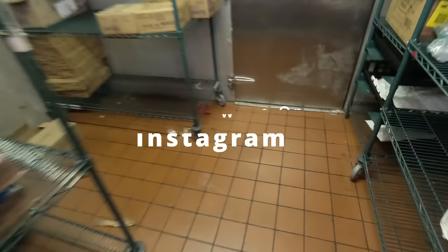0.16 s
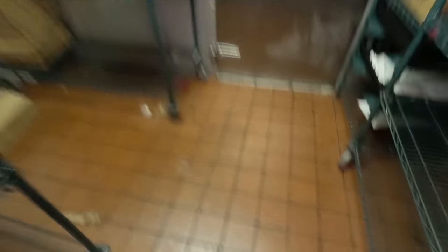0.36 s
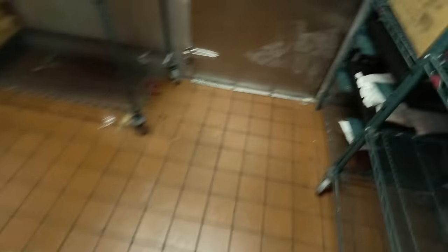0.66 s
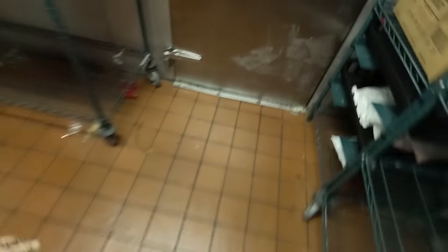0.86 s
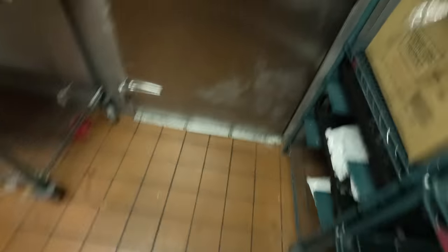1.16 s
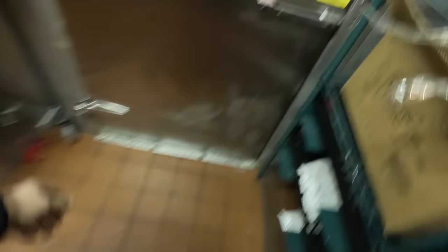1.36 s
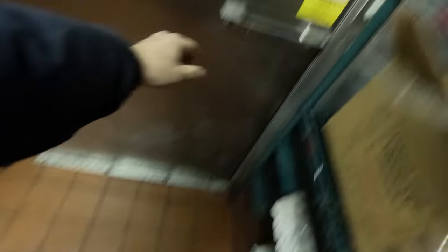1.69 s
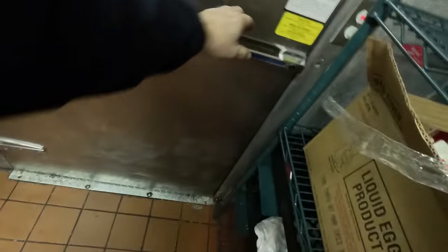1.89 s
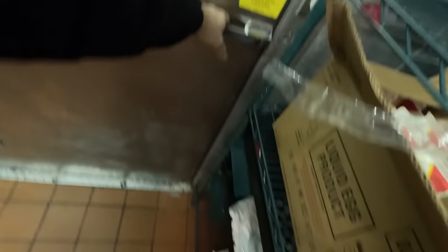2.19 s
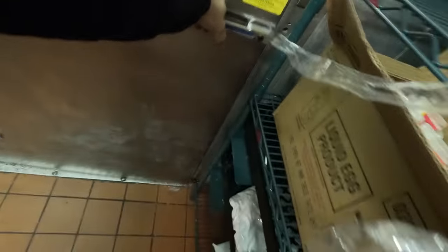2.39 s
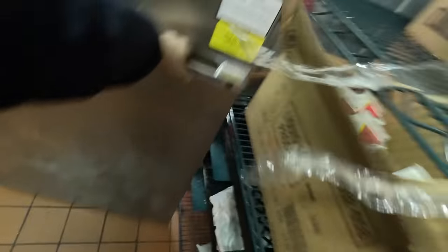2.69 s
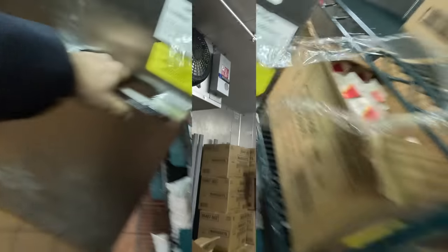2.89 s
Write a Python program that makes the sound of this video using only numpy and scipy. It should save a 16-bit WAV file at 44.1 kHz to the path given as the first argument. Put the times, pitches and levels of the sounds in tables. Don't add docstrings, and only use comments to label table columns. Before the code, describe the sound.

Steady fan roar and low hum fill a tiled kitchen cooler; a wire rack clanks hard, a caster squeaks, then a freezer door latch clunks three times and opens, heard close on a handheld microphone.

```python
import sys
import numpy as np
from scipy import signal
from scipy.fft import rfft, irfft, next_fast_len
from scipy.io import wavfile

SR = 44100
rng = np.random.default_rng(int(sys.argv[2]) if len(sys.argv) > 2 else 0)


def generate_wav(sig):
    pcm = np.round(np.clip(np.atleast_2d(sig).T, -1, 1) * 32767).astype(np.int16)
    wavfile.write(sys.argv[1], SR, pcm)


def gain_from_db(level_db):
    decades = np.asarray(level_db, float) / 20
    return 10 ** decades


N = 134505
T = np.arange(N) / SR

# t/s, level/dB
AIR_LEVEL = [(0.0, -28.5), (0.11, -27), (0.63, -26), (0.94, -28), (1.34, -29), (1.57, -34.5), (1.83, -34),
             (2.39, -30.5), (2.55, -29), (2.67, -25), (2.8, -33), (3.05, -36.5)]
# f/Hz, level per Hz/dB
AIR_COLOUR = [(80, -40.5), (118, -19), (250, -19.5), (380, -12), (470, -23.5), (1000, -26.5), (2600, -29),
              (7000, -47),
              (9000, -72.5), (10500, -56), (12000, -57), (15000, -66)]
# f/Hz, width/Hz, level/dB
BOX_TONES = [(135, 13, 6.5), (208, 74, 5.5), (321.4, 40.7, 2), (593, 64, 6)]
# t/s, f/Hz, level/dB, upper tone level/dB
BLADE = [(0.0, 246.7, -13, -25), (0.02, 245.1, -25, -29), (0.27, 244.7, -12.5, -16),
         (0.33, 244.5, -13.5, -46), (0.39, 244.9, -14.5, -30.5), (0.71, 245, -15.5, -40.5),
         (0.73, 243, -22, -26), (0.9, 243.7, -9, -29.5), (1.05, 244.6, -14, -18.5), (1.13, 243.7, -19, -26),
         (1.23, 243.0, -12, -21), (1.64, 243.9, -24, -39.5), (2.41, 244.2, -25, -29), (2.45, 243, -16, -38),
         (2.58, 242.9, -25, -31), (2.65, 240, -17, -30.5), (2.79, 248.4, -34.5, -24),
         (3.05, 242.6, -29, -45)]
# t/s, level/dB, length/s, f/Hz
RUSTLES = [
    (0.888, -41, 0.025, 6800),
    (2.424, -50, 0.021, 3870),
]
# t/s, level/dB, time to fall 60 dB/s, centre f/Hz, width as share of centre
CRACKS = [(1.195, -36, 0.093, 4000, 1), (1.244, -21, 0.33, 2590, 0.45), (1.3695, -20.5, 0.34, 2030, 1.1),
          (1.369, -29.5, .15, 5430, 0.16), (1.399, -26, 0.37, 2870, 0.54), (1.452, -34.5, 0.11, 4030, 0.82),
          (1.694, -47, .03, 7200, 0.56), (1.916, -34.5, 0.019, 4720, 0.29), (2.358, -41, 0.067, 6950, 0.67),
          (2.502, -38, 0.027, 7130, 0.12), (2.519, -39, 0.039, 8000, .6), (2.569, -31, 0.019, 6570, 0.57),
          (2.5969, -12, 0.028, 2460, 0.56), (2.605, -30.5, 0.34, 1780, 0.54),
          (2.708, -17, 0.059, 1990, 1.25), (2.715, -34.5, 0.37, 3080, 1.8), (2.8195, -22, 0.07, 2510, 1.14),
          (2.824, -24, 0.2, 1800, 1.7), (2.821, -39, 0.11, 7000, 0.69)]
# t/s, level/dB, rattle length/s, strongest f/Hz, spread/octaves
RACK_HITS = [
    (1.1955, -15.5, 0.023, 3400, 0.77),
    (1.2432, -14.5, 0.016, 3050, .7),
    (1.251, -11, 0.076, 2180, 0.21),
    (1.255, -17.5, 0.074, 1010, .7),
    (1.285, -26, .04, 2900, 0.28),
    (1.367, -16.5, 0.093, 1570, 0.66),
]
# f/Hz, level/dB, time to fall 60 dB/s
RACK_TONES = [(845, 1.5, 0.11), (1058, 5.5, 0.04), (1445, 6.5, 0.021), (1974, 0, 0.02), (2193, -5, 0.044),
              (2566, 4, 0.017), (2860, -7, 0.013), (2930, -6.5, 0.013), (3000, -10, 0.02),
              (3194, -7.5, 0.017), (3610, 5.5, .02), (4690, -21, 0.044)]
# t/s, level/dB, contact f/Hz, share of full ring time
THUDS = [(1.200, 2.5, 1220, 0.16), (1.209, 1, 480, .6), (1.229, -5, 355, 0.81), (1.249, -3.5, 946, 0.54),
         (1.3, -4.5, 400, 0.17), (1.374, -11.5, 900, 0.24), (1.387, -10, 900, 0.82),
         (1.444, -8.5, 500, 0.56), (2.5994, -1, 900, 0.7), (2.605, -2, 596, 1.4), (2.627, -3.5, 496, 0.44),
         (2.714, -7.5, 930, 0.81), (2.83, -10, 1200, 0.48), (2.836, -7, 700, 0.46), (2.855, -12, 300, 0.78)]
# f/Hz, level/dB, time to fall 60 dB/s
PANEL_TONES = [(143, -14, 0.62), (193.4, -1.5, 0.38), (219, 2, 0.25), (265.4, -0.5, 0.75), (300, -1.5, 0.1),
               (343.4, 0.5, 0.067), (407.3, -1, 0.13), (514, 0, 0.083), (575, -1.5, 0.087),
               (665, 2.5, 0.068), (773, 4.5, 0.033), (918, -10, 0.18), (1210, -4, 0.11)]
# t/s, level/dB, time to fall 60 dB/s, centre f/Hz, width as share of centre
SQUEAKS = [
    (1.25, -23, .25, 2170, .06),
    (1.28, -25, .15, 2950, .08),
    (1.567, -23, .08, 2500, .07),
    (1.577, -25, .28, 3080, .07),
    (1.59, -30, .3, 2520, .05),
]
# t/s, level/dB, f/Hz, rise/s
PUSHES = [
    (1.27, -13, 200, .025),
    (1.375, -11, 45, .03),
    (1.50, -24, 55, .04),
    (2.44, -21, 60, .02),
    (2.598, -10, 215, .03),
    (2.61, -12, 80, .035),
    (2.70, -24, 60, .02),
    (2.85, -22, 105, .03),
]
# f/Hz, width/Hz, level/dB
FREEZER_TONES = [(1590, 200, 5), (3500, 240, -0.5), (510, 49, 1), (400, 37, 12), (256, 34, 12.5),
                 (130, 22, 13.5)]


def rms_one(x):
    return x / np.sqrt(np.mean(x ** 2) + 1e-20)


def drift(rate_hz):
    r = np.exp(-80 * np.pi * rate_hz / SR)
    noise = rng.standard_normal(N // 40 + 2002)
    slow = signal.lfilter([1], [1, -2 * r, r * r], noise)[2000:]
    return np.interp(np.arange(N) / 40, np.arange(len(slow)), rms_one(slow))


def ring(x, hz, t60):
    r = gain_from_db(-60 / (t60 * SR))
    w = 2 * np.pi * hz / SR
    return signal.lfilter([0, np.sin(w)], [1, -2 * r * np.cos(w), r * r], x + 1e-18)


def resonate(x, hz, width):
    r = np.exp(-np.pi * width / SR)
    turn = 2 * np.cos(2 * np.pi * hz / SR)
    return signal.lfilter([(1 - r * r) / 2, 0, (r * r - 1) / 2], [1, -turn * r, r * r], x)


def high_pass(x, hz):
    return signal.sosfilt(signal.butter(2, hz, "high", fs=SR, output="sos"), x)


def dying(s, t60, attack):
    age = np.maximum(T - s, 0)
    return np.minimum(age / max(attack, 1e-4), 1) * gain_from_db(-60 * age / t60)


def grit(hz, width):
    grains = rng.standard_normal(N) * gain_from_db(drift(180))
    once = resonate(grains, hz, 1.33 * width)
    return rms_one(resonate(once, hz, 1.33 * width))


def fan_air():
    colour_hz, colour_db = np.transpose(AIR_COLOUR)
    white = rng.standard_normal((2, N))
    edges = 70 * 2 ** np.arange(0, 7.9, .5)
    together = drift(3)
    roar = 0
    for k, (low, high) in enumerate(zip(edges, edges[1:])):
        band = signal.sosfilt(signal.butter(2, [low, high], "band", fs=SR, output="sos"), white[k % 2])
        band_db = np.interp(np.log(low * high) / 2, np.log(colour_hz), colour_db)
        flicker_db = .8 * (0.2 * together + drift(8.8))
        roar = roar + band * gain_from_db(band_db + flicker_db)
    roar = roar + sum(gain_from_db(db) * resonate(roar, hz, width) for hz, width, db in BOX_TONES)
    s, db = np.transpose(AIR_LEVEL)
    return gain_from_db(np.interp(T, s, db) + 8) * rms_one(roar)


def blade_tone():
    wobble_db, half_db, double_db, upper_ratio = 2.0, -27, -26, 1.491
    s, hz, db, upper_db = np.transpose(BLADE)
    phase = 2 * np.pi * np.cumsum(np.interp(T, s, hz)) / SR
    level = gain_from_db(np.interp(T, s, db) + wobble_db * drift(3.9))
    hum = np.sin(phase) + gain_from_db(half_db) * np.sin(phase / 2) + gain_from_db(double_db) * np.sin(2 * phase)
    upper_level = gain_from_db(np.interp(T, s, upper_db) + wobble_db * drift(2.8))
    upper = upper_level * np.sin(2 * np.pi * upper_ratio * np.mean(hz) * T)
    return np.sqrt(2) * (level * hum + upper)


def rustles():
    out = 0
    for s, db, length, hz in RUSTLES:
        swell = np.exp(-.5 * ((T - s) / length) ** 2)
        out = out + gain_from_db(db) * swell * grit(hz, 0.67 * hz)
    return out


def scrapes(events):
    out = 0
    for s, db, t60, hz, share in events:
        out = out + gain_from_db(db) * dying(s, t60, 0.0066 * t60) * grit(hz, share * hz)
    return out


def cracks():
    return scrapes(CRACKS)


def rack():
    clicks_per_s = 1600
    chosen = rng.random(N) < clicks_per_s / SR
    size = rng.standard_normal(N)
    trains = []
    for s, db, length, _, _ in RACK_HITS:
        chatter = dying(s, 2.34 * length, 0) * (T < s + length) * chosen * .5 * size
        chatter[int(s * SR)] += 1
        trains.append(gain_from_db(db) * chatter)
    out = 0
    for hz, db, t60 in RACK_TONES:
        clicks = 0
        for train, (_, _, _, strongest_hz, spread) in zip(trains, RACK_HITS):
            octaves_off = np.log2(hz / strongest_hz)
            clicks = clicks + train * np.exp(-.5 * (octaves_off / spread) ** 2)
        luck_db = 1.9 * rng.standard_normal(N)
        out = out + ring(clicks * gain_from_db(db - 7.5 + luck_db), hz, t60)
    return out


def thuds():
    out = np.zeros(N)
    for s, db, contact_hz, share in THUDS:
        start = int(s * SR)
        age = np.maximum(T - s, 0)
        push = age * np.exp(-2 * np.pi * contact_hz * age)
        push = push[start:] / push.sum()
        for k, (hz, tone_db, t60) in enumerate(PANEL_TONES):
            luck, shift = rng.standard_normal(2)
            level = (-1) ** (k // 3) * gain_from_db(db + tone_db + 2.0 * luck - 8.0)
            out[start:] += level * ring(push, hz * (1 + .04 * shift), t60 * share)
    return high_pass(out, 116)


def squeaks():
    return scrapes(SQUEAKS)


def pushes():
    out = 0
    for s, db, hz, rise in PUSHES:
        age = np.maximum(T - s, 0)
        swell = age / rise * np.exp(1 - age / rise)
        out = out + gain_from_db(db) * swell * np.sin(2 * np.pi * hz * age)
    return out


def freezer():
    open_s, rise_s, level_db = 2.984, 0.06, -37
    white = rng.standard_normal(N)
    hum = 0
    for hz, width, db in FREEZER_TONES:
        hum = hum + gain_from_db(db) * rms_one(resonate(resonate(white, hz, width), hz, width))
    return gain_from_db(level_db) * np.clip((T - open_s) / rise_s, 0, 1) * hum


def room(x):
    t60_s, wall_cut_hz = .3, 3300
    size = next_fast_len(N + SR)
    w = 2 * np.pi * np.arange(size // 2 + 1) / size
    dull = 1 / (1 + 1j * w * SR / (2 * np.pi * wall_cut_hz))
    echoes = 0
    for k, lag in enumerate(rng.uniform(0.0068, .03, 10)):
        loop = gain_from_db(-60 * lag / t60_s) * dull * np.exp(-1j * w * int(lag * SR))
        echoes = echoes + (-1) ** k * loop / (1 - loop)
    return irfft(rfft(x, size) * echoes, size)[:N]


def scene():
    fans = fan_air() + blade_tone()
    sharp = rustles() + cracks() + rack() + squeaks()
    low = thuds() + pushes()
    mix = fans + sharp + low + freezer() + gain_from_db(-16.5) * room(sharp)
    return mix[None]


def low_pass(x):
    return signal.sosfilt(signal.butter(12, 15700, fs=SR, output="sos"), x)


def record(dry):
    x = high_pass(dry, 108)
    x = signal.sosfilt(signal.butter(4, 8000, fs=SR, output="sos"), x)
    x = x - resonate(x, 9045, 500)
    x = x + gain_from_db(5.0) * resonate(x, 9900, 1100)
    return low_pass(np.clip(x, -1, 1))


dry = scene()
out = record(dry)
generate_wav(out)
```